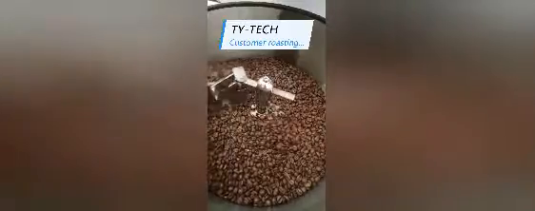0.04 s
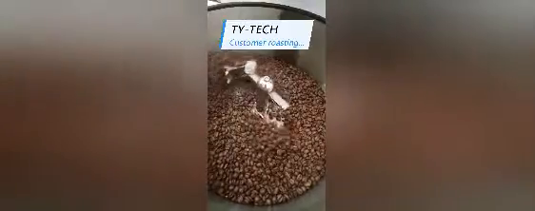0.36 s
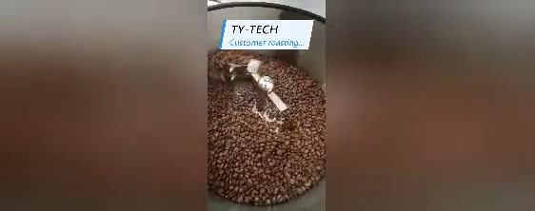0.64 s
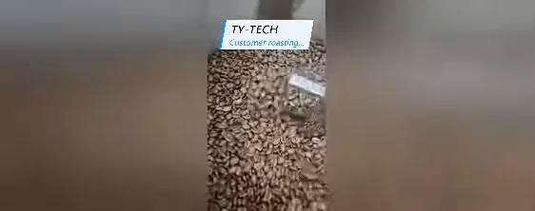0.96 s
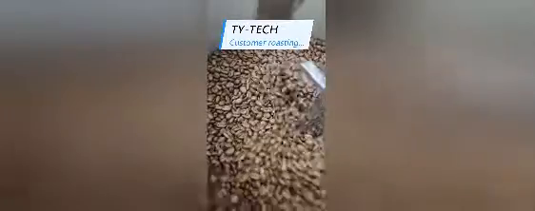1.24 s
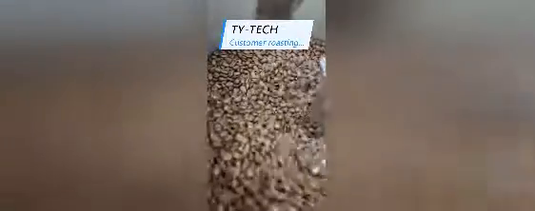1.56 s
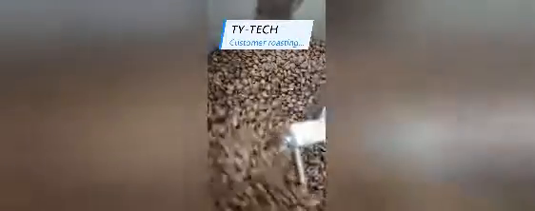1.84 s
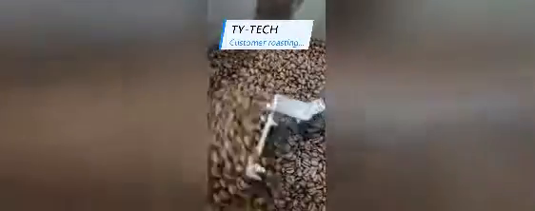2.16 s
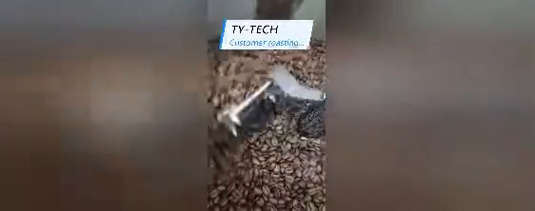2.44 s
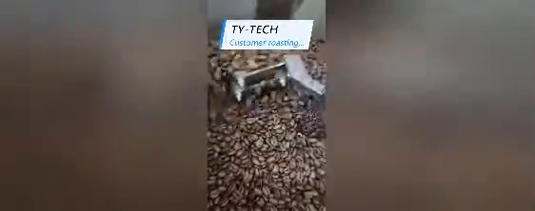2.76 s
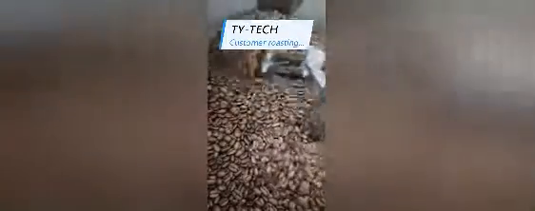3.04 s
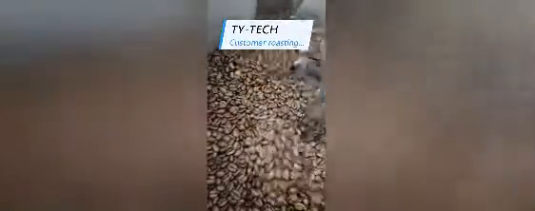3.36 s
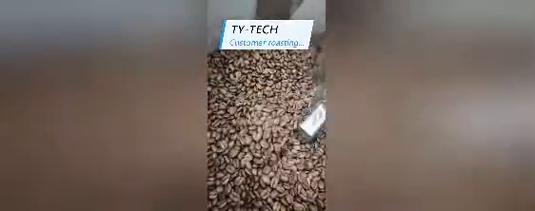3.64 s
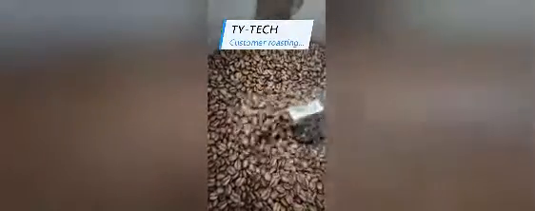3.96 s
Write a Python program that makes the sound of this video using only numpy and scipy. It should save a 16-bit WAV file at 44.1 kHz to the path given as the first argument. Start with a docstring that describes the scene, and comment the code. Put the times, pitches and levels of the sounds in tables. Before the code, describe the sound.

Coffee beans rustle as a motor-driven arm stirs them over a humming fan.

```python
"""A coffee roaster's cooling tray, heard from two spots with a short silence between them.
A motor-driven arm stirs the beans into a dense rustle of tiny contacts, while the fan hums and
pushes air through the ducts. At the first spot the motor adds a thin buzz. At the second, close
to the tray, beans catch under the arm, scrape and snap against the steel, crunch and scatter."""
import sys
import numpy as np
from scipy import signal
from scipy.fft import rfft, irfft
from scipy.io import wavfile
from scipy.ndimage import uniform_filter1d

SR = 44100
rng = np.random.default_rng(int(sys.argv[2]) if len(sys.argv) > 2 else 0)


def master(y):
    """Save y as 16-bit WAV."""
    cut = np.clip(np.atleast_2d(y).T, -1, 1)
    pcm = np.round(cut * 32767)  # scale
    wavfile.write(sys.argv[1], SR, pcm.astype(np.int16))


N = 176400
T = np.arange(N) / SR


def beans(spectrum, pan_db):
    """The arm ploughs through the beans: thousands of contacts a second blur into a rustle."""
    # swell of the rustle as the arm ploughs on: time_s, gain_db
    stirring = [(0, 2.5), (1.2, -2), (1.4, 4.5), (1.92, 1.5), (2.05, -4), (2.2, -4), (2.45, 1), (2.72, -1),
                (2.9, -5), (3.15, -2.5), (4, -2.5)]
    # extra gain on the low, rubbing part: time_s, gain_db
    rubbing = [(0, -4), (.8, -0.5), (1.3, -1.5), (3.2, -1), (4, 4)]
    split_hz, flicker_db = 3380, 0.85
    rustle = hollow_colour(colour(contacts(per_s=9000, spread_db=2.5), spectrum))
    rub = cut(rustle, split_hz, "low", order=3) * level(rubbing)
    clatter = cut(rustle, split_hz, "high", order=3) * pan(pan_db)
    return (rub + clatter) * level(stirring) * from_db(flicker_db * drift(rate_hz=9))


def contacts(per_s, spread_db):
    """Random bean-on-bean clicks of uneven size, different on each side; unit power."""
    sizes = from_db(spread_db * np.minimum(rng.exponential(1, (2, N)), 5))
    return rms_one(sizes * rng.choice([-1, 1], (2, N)) * (rng.random((2, N)) < per_s / SR))


def hollow_colour(x):
    """Very short echoes, different on each side, give the rustle a hollow, finely rippled colour."""
    count, echo_gain = 14, from_db(-18.5)
    lags = (rng.uniform(.001, .012, (2, count)) * SR).astype(int)
    echoes = np.array([sum((-1) ** k * delay(side, lag) for k, lag in enumerate(side_lags))
                       for side, side_lags in zip(x, lags)])
    return (x + echo_gain * echoes) / np.sqrt(1 + count * echo_gain ** 2)


def snaps():
    """Beans snap against the tray: ringing steel, a crack with a short diffuse tail, a dull thud."""
    # beans hitting the steel: start_s, level_db, pan_left_db, thud_relative_db
    hits = [(1.3626, -6, 0, -8), (1.7994, -16, 7, 0), (1.8041, -7, -8.5, -7), (1.9736, -8.5, 1.5, 2),
            (2.4185, -19.5, 5, 7), (2.7605, -16, 11, -6), (2.7642, -11, -2.5, 13), (3.2745, -21, 5, -4),
            (3.6195, -9.5, 5, -11)]
    # resonances of the tray: pitch_hz, level_db, t60_s
    tray_modes = [(2280, 0.5, 0.014), (2710, -2.5, 0.005), (4900, -1, 0.0075), (5200, -1, 0.0092),
                  (5730, -5, 0.016), (8130, -3.5, 0.0051)]
    rise_s, crack_t60_s, tail_t60_s = 0.0008, .011, 0.27
    strike_db, chatter_db, crack_db, tail_db = -8, -11, -3.5, -15.5
    force, push, rings = 0, 0, 0
    strikes = np.zeros((len(tray_modes), 2, N))
    for start_s, db, pan_db, thud_db in hits:
        gain = from_db(db) * pan(pan_db)
        attack = np.clip((T - start_s) / rise_s, 0, 1)
        burst = decay(start_s, crack_t60_s)
        force += gain * attack * (burst + from_db(tail_db) * decay(start_s, tail_t60_s))
        push += from_db(db + thud_db) * burst
        for strike in strikes:  # each mode answers a touch late, with a strength of its own
            onset = int((start_s + rng.uniform(.0003, .0013)) * SR)
            strike[:, onset] = gain[:, 0] * from_db(rng.normal(0, 2, 2))
    for strike, (hz, db, t60_s) in zip(strikes, tray_modes):
        build_up = np.sqrt(t60_s * SR / np.log(1000) / 4)  # the mode's gain on noise
        chatter = force * rng.standard_normal((2, N)) / build_up
        drive = from_db(strike_db) * strike + from_db(chatter_db) * chatter
        rings += from_db(db) * ring(drive, hz, t60_s)
    crack = cut(force * rng.choice([-1, 1], (2, N)), 940, "high", order=1)
    crack = cut(crack, 8300, "low", order=1)
    thud = cut(push * rng.choice([-1, 1], N), 595, "low", order=3)
    return rings + from_db(crack_db) * crack + thud


def crunches():
    """A jammed bean is crushed and its neighbours scatter: bright crackle swells and settles."""
    # crushed beans: peak_s, level_db
    crushes = [(1.818, -7), (2.776, -5)]
    # colour of the crackle: frequency_hz, level_db
    spectrum = [(1400, -87), (2300, -59), (3600, -60.5), (5000, -58), (8500, -56.5), (11000, -67),
                (14500, -62)]
    rise_s, t60_s = 0.15, 0.23
    swell = sum(from_db(db - 60 * np.abs(T - peak_s) / np.where(T < peak_s, rise_s, t60_s))
                for peak_s, db in crushes)
    crackle = colour(contacts(per_s=6000, spread_db=4.0), spectrum)
    return swell * pan(-3.5) * cut(crackle, 200, "high")


def scrapes():
    """A bean dragged along the steel makes one narrow resonance sing, swelling and fading."""
    # dragged beans: peak_s, length_s, pitch_hz, level_db, t60_s
    drags = [(1.594, 0.19, 3080, -43, .12), (2.3, 0.64, 4620, -43, 0.013)]
    out = 0
    for peak_s, length_s, hz, db, t60_s in drags:
        swell = np.cos(np.pi * np.clip((T - peak_s) / length_s, -.5, .5))
        out += from_db(db) * swell * rms_one(ring(rng.standard_normal((2, N)), hz, t60_s))
    return out


def ticks():
    """Single beans click close by, each a tiny burst of bright noise."""
    # lone beans: start_s, level_db
    clicks = [(2.119, -29), (3.375, -28)]
    force = sum(from_db(db) * decay(start_s, t60_s=0.0082) for start_s, db in clicks)
    return cut(force * rng.standard_normal((2, N)), 6000, "high", order=1)


def puffs():
    """Air pushed aside by the arm buffets the microphone: soft thumps of falling pitch."""
    # puffs of air: start_s, level_db
    gusts = [(1.8, -17.5), (2.764, -8.5)]
    start_hz, octave_fall_s = 85, 0.019
    out = 0
    for start_s, db in gusts:
        cycles = start_hz * octave_fall_s * np.log1p(np.maximum(T - start_s, 0) / octave_fall_s)
        out += from_db(db) * decay(start_s, t60_s=0.11) * np.sin(2 * np.pi * cycles)
    return out * np.array([[1], [-0.52]])  # the two sides are pushed opposite ways


def fan(tones, air_spectrum, tone_gain=1):
    """Fan and motor hum in slightly wavering tones over turbulent air in the ducts."""
    # likeness of left and right in the rushing air: frequency_hz, correlation
    air_likeness = [(40, 0.8), (320, 0.93), (700, 0.021)]
    # balance of the air against the tones: time_s, gain_db
    air_level = [(1.5, -1.5), (3.25, -1), (3.55, 1.5)]
    # level of the whole whir, with a few brief dips: time_s, gain_db
    whir_level = [(0, 0.5), (.8, 0), (1.24, -6.5), (1.3, 0.5), (1.75, 0.5), (1.96, -1.5), (2.01, -7),
                  (2.45, 0), (2.75, 0.5), (2.79, -6), (3.17, -1), (3.55, -0.5), (4, 1)]
    wander_hz = .6
    alike = per_bin(air_likeness)
    mid, side = rfft(rng.standard_normal((2, N)))
    white = irfft(np.sqrt((1 + alike) / 2) * mid + np.sqrt((1 - alike) / 2) * side * [[1], [-1]], N)
    whir = colour(white, air_spectrum) * level(air_level)
    for hz, db, flutter_depth in tones:
        phase = 2 * np.pi * np.cumsum(hz + wander_hz * drift(rate_hz=4)) / SR
        flutter = 1 + flutter_depth * drift(rate_hz=6)
        whir += np.sqrt(2) * from_db(db) * tone_gain * flutter * np.sin(phase)
    return cut(whir, 28, "high") * level(whir_level) * pan(0.64)


def motor_buzz():
    """The motor's iron hums at twice the mains rate; only high harmonics get through the housing."""
    pitch_hz, centre_hz, width_hz = 120.1, 2320, 1100
    harmonics_hz = pitch_hz * np.arange(10, 30)
    housing = np.exp(-((harmonics_hz - centre_hz) / width_hz) ** 2 / 2)
    gains = from_db(-53.5 + rng.normal(0, 2.7, (2, len(harmonics_hz)))) * housing
    return sum(np.sqrt(2) * gain[:, None] * np.sin(2 * np.pi * (hz * T + rng.random((2, 1))))
               for hz, gain in zip(harmonics_hz, gains.T))


def from_db(db):
    """Decibels to gain."""
    return 10 ** (np.asarray(db) / 20)


def pan(left_db):
    """Stereo gains that put the left side left_db above the right."""
    return from_db([[left_db / 2], [-left_db / 2]])


def rms_one(x):
    """Scale to unit power."""
    return x / np.sqrt(np.mean(x ** 2) + 1e-20)


def level(rows):
    """A fader ride through (time_s, gain_db) rows."""
    return from_db(np.interp(T, *np.transpose(rows)))


def per_bin(points):
    """A (frequency_hz, value) curve read at every FFT bin."""
    hz, value = np.transpose(points)
    return np.interp(np.log(np.arange(N // 2 + 1) * SR / N + 1e-9), np.log(hz), value)


def colour(white, spectrum):
    """Give unit white noise a spectrum in dB per Hz."""
    return irfft(rfft(white) * from_db(per_bin(spectrum)) * np.sqrt(SR / 2), N)


def cut(x, hz, kind, order=2):
    """Butterworth low- or high-pass."""
    return signal.sosfilt(signal.butter(order, hz, kind, fs=SR, output="sos"), x + 1e-18)


def delay(x, samples):
    """Shift one channel later."""
    return np.pad(x, (samples, 0))[:N]


def drift(rate_hz):
    """Slow random wobble of spread 1."""
    hz = np.arange(N // 2 + 1) * SR / N
    return rms_one(irfft(rfft(rng.standard_normal(N)) * (hz > 0) / (1 + (hz / rate_hz) ** 2), N))


def decay(start_s, t60_s):
    """Envelope that jumps to 1 and dies away."""
    return (T >= start_s) * from_db(-60 * np.abs(T - start_s) / t60_s)


def ring(x, hz, t60_s):
    """One mode; a unit click rings with height 1."""
    radius, angle = np.exp(-np.log(1000) / (t60_s * SR)), 2 * np.pi * hz / SR
    return signal.lfilter([np.sin(angle)], [1, -2 * radius * np.cos(angle), radius ** 2], x + 1e-18)


def scene():
    """The first spot, a silence, then the spot beside the arm."""
    # rustle of the stirred beans at each spot: frequency_hz, level_db
    first_rustle = [(700, -82.5), (1500, -74.5), (2050, -64.5), (2800, -68), (3900, -76.5), (4700, -71.5),
                    (6700, -79), (10000, -84), (15500, -95)]
    second_rustle = [(700, -87.5), (1550, -78), (2050, -65.5), (2900, -70), (4150, -73), (4750, -65),
                     (5400, -72), (5850, -69), (6600, -74), (8500, -75.5), (10800, -87.5), (13000, -83.5)]
    # hum of fan and motor at each spot: pitch_hz, level_db, flutter_depth
    first_tones = [(139.4, -18.5, 0.17), (279.8, -34.5, 0.48), (729, -42.5, 0.33)]
    second_tones = [(193.8, -27, 0.29), (263.4, -41, 0.89), (525.4, -50.5, 0.76)]
    # air rushing through the ducts at each spot: frequency_hz, level_db
    first_air = [(30, -75), (90, -54), (125, -49), (215, -45.5), (255, -52), (303, -47), (340, -56),
                 (560, -62), (660, -63.5), (745, -55.5), (850, -65.5), (1400, -73.5), (3000, -99)]
    second_air = [(45, -70.5), (100, -53), (135, -45.5), (165, -53), (230, -53), (310, -56.5), (385, -58.5),
                  (450, -65.5), (620, -70.5), (760, -58), (900, -71.5), (1400, -74.5), (3000, -99)]
    # the hum at the second spot wavers and sinks into the rumble: time_s, gain_db
    hum_level = [(1.9, 1.5), (2.35, -2.5), (3.08, 2.5), (3.19, -8.5), (3.27, 1.5), (4, 2)]
    first_end_s, second_start_s = 0.824, 1.185
    first = fan(first_tones, first_air) + motor_buzz() + beans(first_rustle, pan_db=3.0)
    second = fan(second_tones, second_air, level(hum_level)) + beans(second_rustle, pan_db=1.7)
    second += scrapes() + snaps() + ticks() + crunches() + puffs()
    first_gate = uniform_filter1d(1. * (T < first_end_s), size=64)
    second_gate = uniform_filter1d(1. * (T > second_start_s), size=64)
    return first * first_gate + second * second_gate


def record(dry):
    """Sound reaches the right side a little later; the top treble is cut steeply."""
    right_lag_s, cutoff_hz = .00023, 15500
    heard = np.array([dry[0], delay(dry[1], int(right_lag_s * SR))])
    return signal.sosfilt(signal.ellip(10, .1, 90, cutoff_hz, fs=SR, output="sos"), heard + 1e-18)


dry = scene()
out = record(dry)
master(out)
```